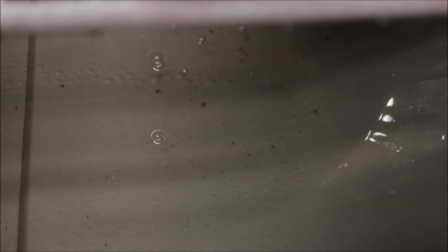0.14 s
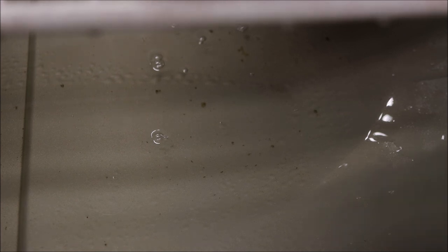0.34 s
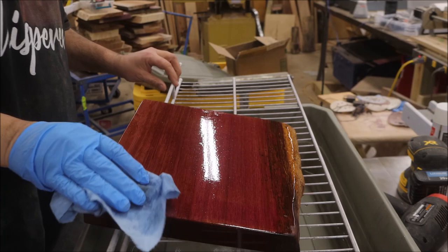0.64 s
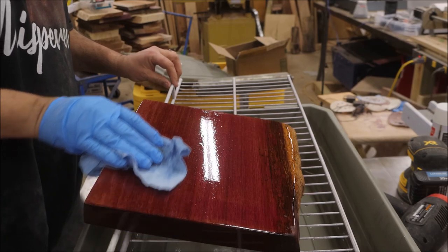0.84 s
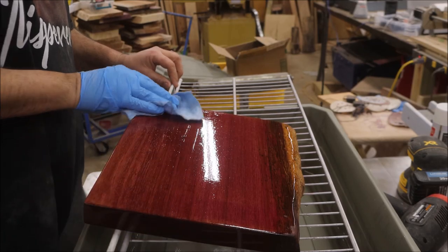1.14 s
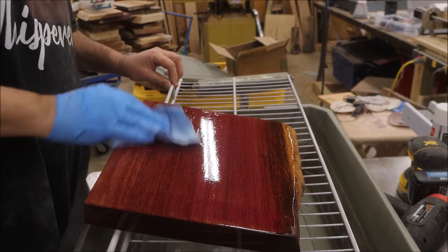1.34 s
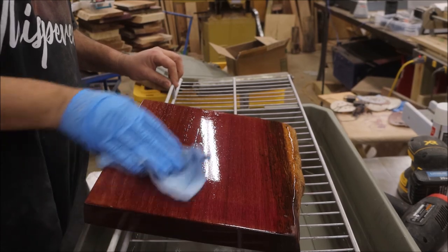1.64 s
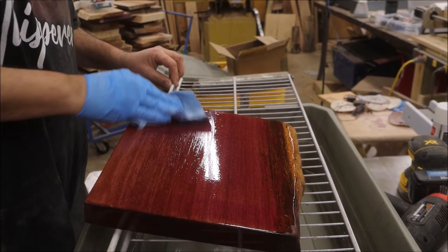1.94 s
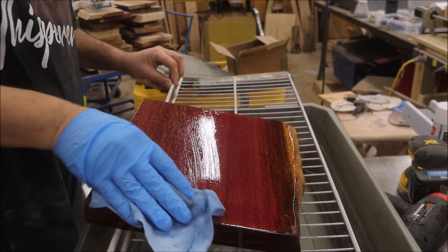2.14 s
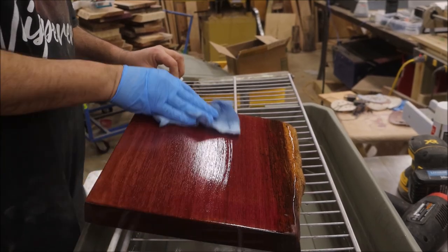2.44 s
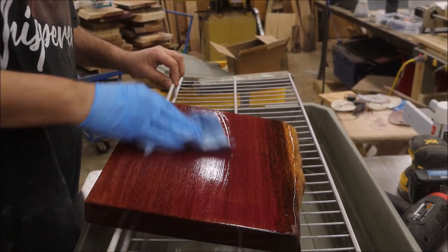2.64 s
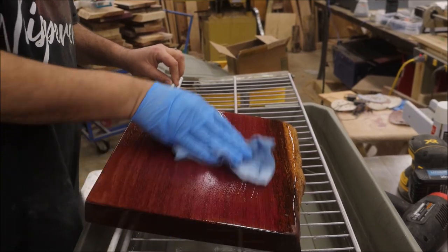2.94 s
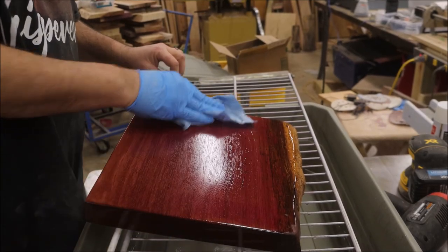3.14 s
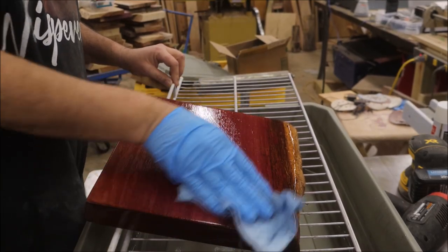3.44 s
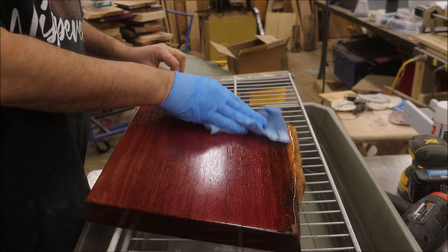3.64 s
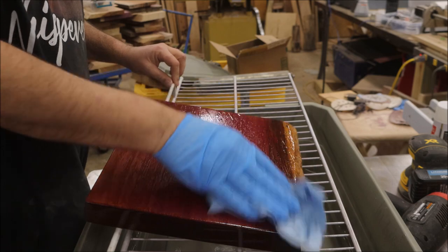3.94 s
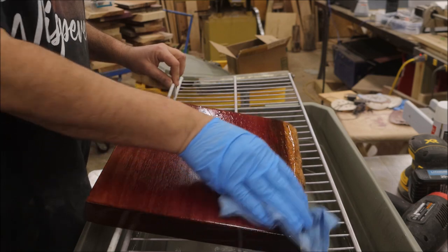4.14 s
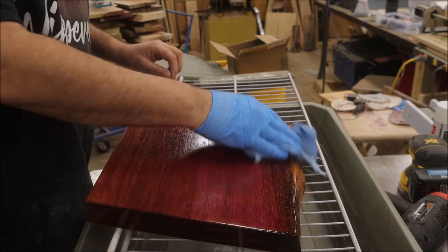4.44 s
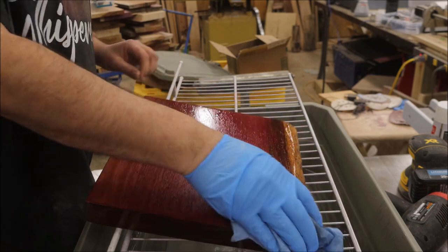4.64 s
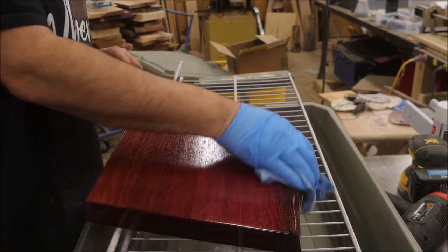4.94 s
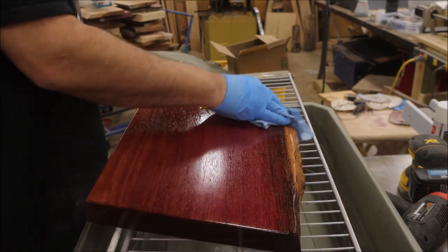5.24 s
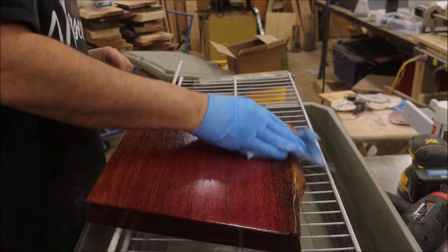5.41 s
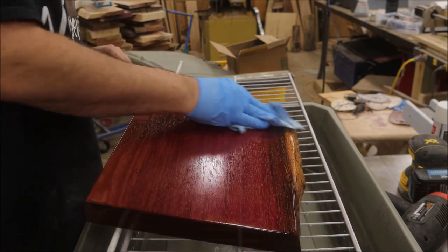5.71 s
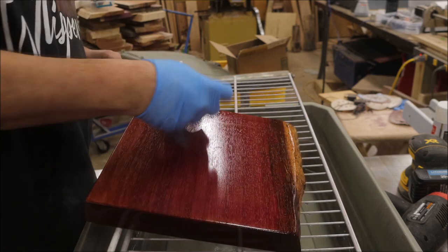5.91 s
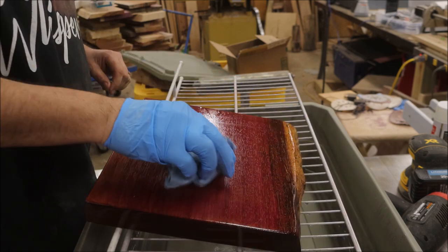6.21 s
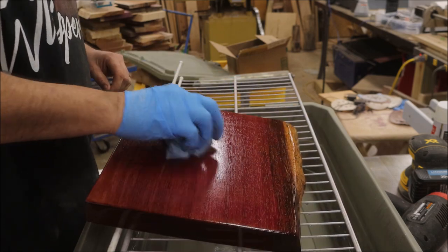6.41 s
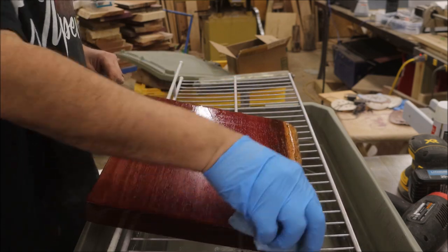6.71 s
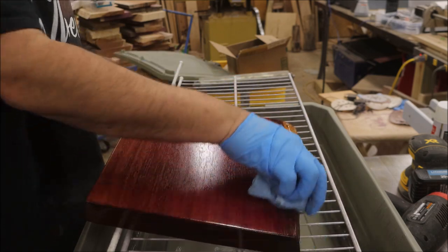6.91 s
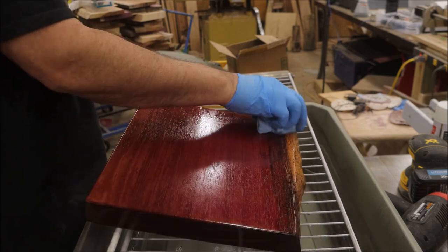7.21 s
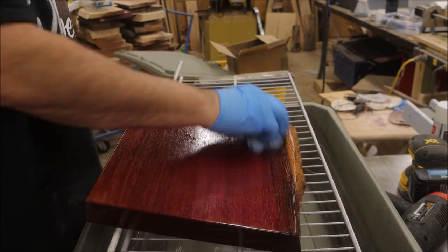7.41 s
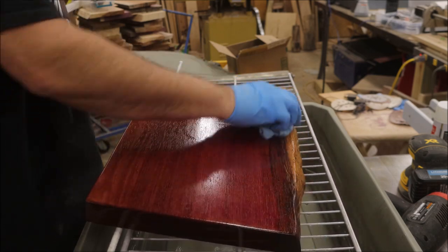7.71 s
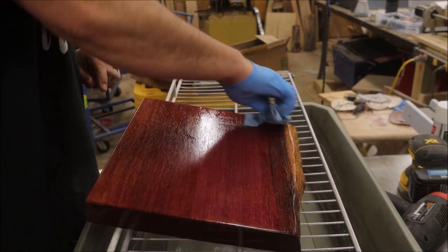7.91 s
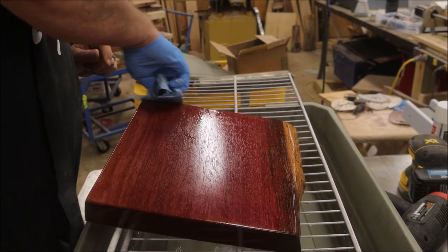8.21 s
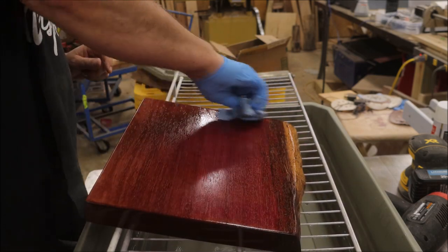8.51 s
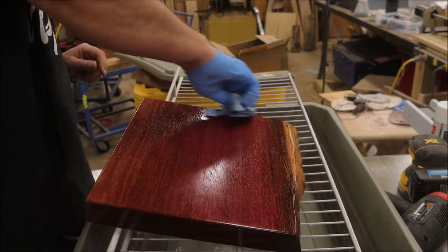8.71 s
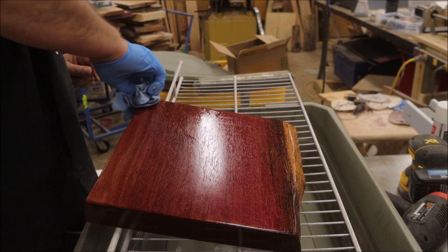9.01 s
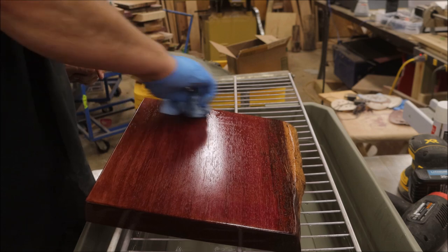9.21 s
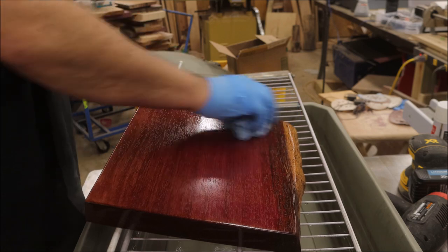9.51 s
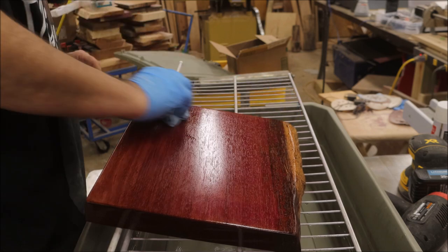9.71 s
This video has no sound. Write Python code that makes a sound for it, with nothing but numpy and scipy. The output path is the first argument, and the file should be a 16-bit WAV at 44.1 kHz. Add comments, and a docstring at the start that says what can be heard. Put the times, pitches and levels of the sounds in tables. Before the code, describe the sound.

A quiet workshop with a faint, dull background, heard close and almost mono. At about 0.5 s a cloth pad starts abruptly on a thick wooden board. Strokes of roughly a quarter to two thirds of a second swish back and forth, airy and crisp when fast, dipping at each turn, over a woody murmur and faint ringing. Soft squeaks appear near 0.8, 1.8, 3.0 and 3.3 s; fibres scuff around 1.5 and 2.1-2.7 s. The board tips and knocks on its wire rack at 3.7, 4.5, 4.9, 7.3 and 7.85 s: short, hollow double clunks with wire chatter and a faint hum, the 4.9 s one duller, the last fullest. Small rattles cluster around 3.6-5.2 s, with tiny ones at 6.2 and 7.0 s. A rougher scuff comes near 7.15 s. Rubbing continues to almost 10 s, with hoarse squeaks around 8.7-9.6 s and a short room echo.

```python
"""Workshop, close up: a gloved hand wipes oil finish over a thick wooden board with a cloth pad.
The cloth is shaped noise that hisses with stroke speed; its drag makes the wood murmur and faintly ring.
The tacky finish makes the pad squeak and grunt; the fibres scuff.
The board lies on a wire rack over a plastic tub: pressed near its edge, it tips and knocks back down,
a sum of decaying modes with wire chatter and a beating hum. The rack rattles; the room echoes softly."""
import sys
import numpy as np
from scipy import signal
from scipy.fft import rfft, irfft, next_fast_len
from scipy.io import wavfile

SR = 44100
rng = np.random.default_rng(int(sys.argv[2]) if len(sys.argv) > 2 else 0)


def digitize_waveform(pressure):
    """Quantize a signal to 16-bit integers and store it at the path in sys.argv[1].

    Rows of a 2-D input are taken as channels; values are limited to [-1, 1].
    """
    field = np.atleast_2d(pressure).T
    bounded = np.clip(field, -1, 1)
    quanta = np.round(bounded * 32767).astype(np.int16)
    wavfile.write(sys.argv[1], SR, quanta)


N = 434826
RUB_START_S = 0.526

# rack spectrum, shaken or rattling: f/Hz, relative level/dB
RACK_SPECTRUM = [(50, -39), (130, -8), (260, 0.5), (620, -5), (850, -6.5), (1500, -7.5), (2500, -27),
                 (8000, -34)]


def amp(db):
    """Decibels to gain."""
    return 10 ** (np.asarray(db) / 20)


def unit(x):
    """Scales to an rms of 1."""
    return x / np.sqrt(np.mean(x ** 2) + 1e-20)


def curve(rows, column):
    """One column of a time table at every sample."""
    rows = np.asarray(rows)
    return np.interp(np.arange(N) / SR, rows[:, 0], rows[:, column])


def read(rows, hz, column=1):
    """One column of a frequency table, on a log axis."""
    rows = np.asarray(rows)
    return np.interp(np.log(hz + 1), np.log(rows[:, 0]), rows[:, column])


def colour(x, spectrum):
    """Gives x a spectrum and an rms of 1."""
    size = next_fast_len(N)
    gain = amp(read(spectrum, np.fft.rfftfreq(size, 1 / SR)))
    return unit(irfft(rfft(x, size) * gain, size)[..., :N])


def wander(per_s, count=N):
    """Random levels joined by straight lines, per_s new ones a second, rms 1."""
    place = np.arange(count) / SR * per_s
    steps = rng.standard_normal(count)
    return unit(np.interp(place, np.arange(count), steps))


def shop_air(level_db=-70.5):
    """Steady, dull background of the workshop: shaped noise."""
    # f/Hz, relative level/dB
    shop_spectrum = [(25, -11), (200, -10), (400, -6), (560, -6.5), (950, -10), (2000, -17.5),
                     (5000, -23.5), (15500, -27)]
    return amp(level_db) * colour(rng.standard_normal(N), shop_spectrum)


def microphone_noise(level_db=-79.5):
    """Faint low-heavy noise of the microphones."""
    spectrum = [(25, 0), (200, -11), (700, -16), (2000, -23)]  # f/Hz, relative level/dB
    return amp(level_db) * colour(rng.standard_normal(N), spectrum)


def strokes():
    """Speed peaks once between turns; returns hiss, fizz and drag levels and the dip at turns, in dB."""
    # strokes from turn to turn; the hand leans on the pad at some turns:
    # turn t/s, hiss at turn/dB, share of stroke speeding up, hiss at full speed/dB,
    # fizz over hiss/dB, drag/dB (levels nominal)
    stroke_rows = [(0.49, -45.5, 0.19, -60, 3, -60), (0.715, -77.5, 0.36, -57.5, -2, -60),
                   (1.399, -64.5, 0.8, -59, 14, -66.5), (1.723, -64.5, 0.2, -61.5, 3.5, -66.5),
                   (2.053, -61, 0.75, -62.5, 14, -64), (2.372, -61, 0.15, -62, 6.5, -69.5),
                   (2.733, -63.5, 0.72, -62.5, 13, -68), (2.988, -54.5, 0.3, -62, 6, -64.5),
                   (3.302, -60.5, 0.74, -60.5, 10, -64.5), (3.577, -58.5, 0.16, -59.5, 6.5, -61),
                   (3.911, -64.5, 0.72, -61.5, 11, -62), (4.239, -66, 0.46, -60.5, 2.5, -65.5),
                   (4.587, -62.5, 0.48, -60, 11.5, -59), (4.909, -82.5, 0.21, -58.5, -0.5, -59),
                   (5.437, -62.5, 0.94, -58, 10, -60.5), (5.702, -62.5, 0.11, -61.5, 0.5, -59.5),
                   (6.128, -67, 0.57, -59.5, 14, -63), (6.309, -70.5, 0.78, -60, -13, -61.5),
                   (6.617, -75, 0.54, -58.5, -3, -67), (6.893, -66, 0.36, -57, -1, -59),
                   (7.51, -60.5, 0.85, -59, 0, -61.5), (7.763, -61, 0.34, -57.5, 0.5, -61.5),
                   (8.059, -91, 0.24, -55.5, -18, -59), (8.516, -69, 0.79, -61.5, 3, -63.5),
                   (8.816, -75, 0.35, -60, 5.5, -63.5), (9.254, -72, 0.42, -59, -21, -65),
                   (9.677, -61.0, 0.65, -61.5, 5, -62.5)]
    last_turn_s = 9.95
    arch = 0.73  # power under 1 rounds the speed ramps
    halt_depth_db, halt_s = 4, 0.021  # the pad all but stops at each turn
    slow_fizz_db, slow_drag_db = -18, 3  # a slow pad loses its fizz and clings a little more
    stall_db, stall_share = -63, 0.48  # hiss below stall_db takes the drag down with it

    t = np.arange(N) / SR
    turn_s, turn_db, rise, full_db = np.transpose(stroke_rows)[:4]
    edges = np.append(turn_s, last_turn_s)
    k = np.clip(np.searchsorted(turn_s, t) - 1, 0, len(turn_s) - 1)
    since = np.maximum(t - edges[k], 0)
    until = edges[k + 1] - t
    done = since / (since + until)
    rise = np.clip(rise, .03, .97)[k]
    speed = np.minimum(done / rise, (1 - done) / (1 - rise)) ** arch  # 0 to 1

    # ramp from the turn behind, then towards the turn ahead
    slowest = amp(np.append(turn_db, turn_db[-1]))[k + (done >= rise)]
    hiss_db = 20 * np.log10(slowest + (amp(full_db)[k] - slowest) * speed)
    fizz_db = hiss_db + curve(stroke_rows, 4) + slow_fizz_db * (1 - speed)
    stall = stall_share * np.minimum(hiss_db - stall_db, 0)
    drag_db = curve(stroke_rows, 5) + slow_drag_db * (1 - speed) + stall
    halt_db = halt_depth_db * np.exp(-(np.minimum(since, until) / halt_s) ** 2)
    return hiss_db, fizz_db, drag_db, halt_db


def friction(snag_db, judder_db, snags_per_s=900, judder_per_s=50):
    """Countless tiny fibre slips and a few larger snags, under an uneven grip."""
    slips = rng.standard_normal(N)
    snags = rng.laplace(size=N) * (rng.random(N) < snags_per_s / SR)
    grip = amp(judder_db * wander(judder_per_s))
    return (slips + amp(snag_db) * unit(snags)) * grip


def cloth(hiss_db, fizz_db, drag_db, halt_db, uneven_db=0.8, uneven_per_s=18):
    """Speed makes the fibres hiss and fizz; drag shakes wood and rack; the pad's rasp follows both."""
    # all five spectra: f/Hz, relative level/dB
    hiss_spectrum = [(1000, -17), (2500, -9), (4000, -2.5), (7000, -1.5), (9000, -3), (12000, -5),
                     (16000, -11)]
    fizz_spectrum = [(4000, -20), (7000, -4), (10000, -2), (12500, 1.5), (14500, 1), (16000, -5)]
    rasp_spectrum = [(1200, -29), (2200, -9.5), (2750, -5), (3400, 0.5), (3850, -1.5), (4300, -7.5),
                     (4900, -15.5), (8000, -26.5)]
    wood_spectrum = [(40, -18), (130, -2.5), (330, -8), (650, -9), (900, -4.5), (1400, 3), (1750, 1),
                     (2100, 1), (3000, -12), (9000, -48)]

    press = amp(uneven_db * wander(uneven_per_s) - halt_db)
    hiss = colour(friction(snag_db=-11.5, judder_db=1.2), hiss_spectrum) * amp(hiss_db + 0.23)
    fizz = colour(friction(snag_db=-26, judder_db=1.0), fizz_spectrum) * amp(fizz_db + 1.1)
    rasp_db = -58.5 + 0.5 * (hiss_db - hiss_db.mean()) + 0.26 * (drag_db - drag_db.mean())
    rasp = colour(friction(snag_db=-13.5, judder_db=1.55), rasp_spectrum) * amp(rasp_db)
    wood = colour(friction(snag_db=-5.0, judder_db=2.5), wood_spectrum) * amp(drag_db - 0.56)
    shudder = colour(friction(snag_db=-5.5, judder_db=2.0), RACK_SPECTRUM) * amp(drag_db - 7.5)
    rubbing = np.arange(N) / SR > RUB_START_S
    return (hiss + fizz + rasp + wood + shudder) * press * rubbing


def board_ring(low_db, high_db, rise_cycles=2.03):
    """Board's answer to one tap: modes build over a few cycles; no two taps hit quite the same spot."""
    # modes of the board on its rack: nominal f/Hz, relative level/dB, t60/s
    board_modes = [(79.5, -27, 0.22), (118.5, -22, 0.23), (163.5, -16, 0.23), (203, -20.5, 0.25),
                   (228.5, -19, 0.3), (254.8, -18, 0.21), (280.8, -9, 0.1), (330, -19.5, 0.24),
                   (539, -10.5, 0.091), (618, -15, 0.16), (660.4, -3.5, 0.1), (700.3, -13.5, 0.16),
                   (955, -23, 0.18), (1090, -23, 0.17), (1290, -29, 0.3), (1405, -10, 0.071),
                   (1594, -5.5, 0.036), (1685, -8.5, 0.066), (1932, -22.5, 0.13), (2036, -21.5, 0.076),
                   (2725, -19.5, 0.038), (3442, -5.5, 0.012)]
    t = np.arange(SR // 3) / SR
    ring = np.zeros(len(t))
    scatter = rng.standard_normal((len(board_modes), 2))
    for (hz, db, t60_s), (detune, share) in zip(board_modes, scatter):
        high = np.clip(np.log2(hz / 700), 0, 1)  # low modes to 700 Hz, high from 1400 Hz
        hz = hz * (1 + .007 * detune)
        db = db + 1.2 * share + low_db + (high_db - low_db) * high
        onset = 1 - np.exp(-t * hz / rise_cycles)
        ring += amp(db - 60 * t / t60_s) * np.sin(2 * np.pi * hz * t) * onset
    return np.pad(ring, (0, SR - len(ring)))


def singing_board(drag_db):
    """The dragging pad keeps the board's high modes ringing faintly: noise through the modes."""
    bunched_s, flat_db, bunched_db = 6.15, -14.5, -7  # bunched under the fingertips, it rings more
    ring = unit(signal.fftconvolve(rng.standard_normal(N), board_ring(-30, 0))[:N])
    t = np.arange(N) / SR
    sing_db = np.where(t < bunched_s, flat_db, bunched_db)
    return ring * amp(drag_db + sing_db) * (t > RUB_START_S)


def squeaks():
    """Tacky stick and slip gather loosely around one pitch, which may slide; each swells and fades."""
    # centre t/s, half length to 1/e/s, f/Hz, half width/Hz, level/dB, glide/(Hz/s)
    squeak_rows = [(0.819, 0.12, 1720, 160, -62.5, -4), (1.767, 0.054, 1707, 99.5, -64, 0),
                   (2.987, 0.024, 1305, 202, -62, -22000), (3.316, 0.057, 1436, 198.4, -58, 2),
                   (7.088, 0.016, 299, 110.3, -58, -6000), (8.697, 0.025, 6700, 1100, -58, -2),
                   (8.961, 0.014, 235, 46.2, -60, -1.5), (9.102, 0.1, 3200, 505, -57, 3),
                   (9.548, 0.11, 1658, 449.4, -56.5, -4000), (9.635, 0.038, 515, 231, -62, -5000)]
    out, t = np.zeros(N + SR), np.arange(SR) / SR - .5
    for s, half_s, hz, width_hz, db, glide in squeak_rows:
        phase = 2 * np.pi * (hz + glide * t / 2) * t
        hoarse = wander(3 * width_hz, count=SR) * np.cos(phase)
        hoarse += wander(3 * width_hz, count=SR) * np.sin(phase)
        swell = np.exp(-np.minimum((t / half_s) ** 2, 20))
        start = round((s - .5) * SR)
        out[start:start + SR] += amp(db) * swell * hoarse
    return out[:N]


def scuffs():
    """Brief patches where the fibres snag and tear free in sparse little ticks."""
    # centre t/s, half length to 1/e/s, level/dB
    scuff_rows = [(1.455, 0.09, -54.5), (2.095, 0.065, -56), (2.376, 0.068, -57), (2.748, 0.084, -56.5),
                  (4.77, 0.04, -58), (6.043, 0.022, -54), (7.156, 0.074, -50)]
    # f/Hz, relative level/dB
    scuff_spectrum = [(300, -8), (1600, -2), (3600, -1), (4800, -7.5), (7500, -11.5), (12000, -34)]
    t = np.arange(N) / SR
    patches = np.zeros(N)
    for s, half_s, db in scuff_rows:
        patches += amp(db) * np.exp(-np.minimum(((t - s) / half_s) ** 2, 20))
    ticks = friction(snag_db=-4.5, judder_db=-1, snags_per_s=500)
    return colour(ticks, scuff_spectrum) * patches


def rattles(contacts_per_s=900):
    """The rack shifts: short flurries of dull little contacts between wires, board and tub."""
    # start t/s, starting level/dB, decay to 1/e/s
    rattle_rows = [(3.609, -51, 0.19), (4.388, -56.5, 0.077), (4.731, -44, 0.0071), (4.746, -44, 0.0054),
                   (4.765, -48, 0.0051), (4.793, -51.5, 0.097), (5.056, -51.5, 0.1), (5.203, -54, 0.094),
                   (6.167, -48, 0.007), (7.036, -50, 0.01)]
    contacts = rng.standard_normal(N) * (rng.random(N) < contacts_per_s / SR)
    t = np.arange(N) / SR
    flurries = np.zeros(N)
    for s, db, decay_s in rattle_rows:
        flurries += amp(db) * (t >= s) * np.exp(-np.minimum(abs(t - s) / decay_s, 20))
    return colour(contacts, RACK_SPECTRUM) * flurries


def knocks(slap_low_db=-17, chatter_s=0.01):
    """An edge lands and rings; the board slaps flat, chatters and is choked; rack and tub hum on."""
    # landing t/s, low modes/dB, high modes/dB, contact hardness as low-pass corner f/Hz,
    # slap/dB, chatter/dB, hum/dB (levels before the high-pass)
    knock_rows = [(3.7016, -10.5, -26, 3000, -18, -51.5, -3.5), (4.5002, -10, -20, 3600, -14.5, -47, -3.5),
                  (4.8995, -14.5, -17, 1400, -27, -66, -11.5), (7.272, -12, -14.5, 3130, -24, -54, -3.5),
                  (7.8527, -8, -8.5, 3630, -16.5, -45, 1)]
    # sympathetic close mode pairs that swell and beat: f/Hz, relative level/dB, t60/s, beat f/Hz
    hum_modes = [(200, -50.5, 1.2, 1.6), (458, -36.5, 0.84, 3.16), (552, -52, 1.33, 1.6)]
    # wire chatter: f/Hz, relative level/dB
    chatter_spectrum = [(900, -18), (1900, -2), (3600, -5), (4600, -17), (8000, -35)]
    slap_delay_s, slap_hz = 0.01, 1720  # slap after landing, its low-pass corner
    seat_s, seat_fade_s, seat_db = 0.017, 0.0033, -8  # the rack chokes the first ring
    radiate_hz = 72  # longer waves slip around the board

    sound, t = np.zeros(N + SR), np.arange(SR) / SR
    seat = amp(seat_db * (1 + np.tanh((t - seat_s) / seat_fade_s)) / 2)
    hum = np.zeros(SR)
    for hz, db, t60_s, beat_hz in hum_modes:
        beat = np.sin(np.pi * beat_hz * t)
        hum += amp(db - 60 * t / t60_s) * np.sin(2 * np.pi * hz * t) * beat
    wires = colour(rng.standard_normal(N), chatter_spectrum)
    burst = np.exp(-np.minimum(((t - seat_s) / chatter_s) ** 2, 20))
    for s, low_db, high_db, corner_hz, slap_db, chatter_db, hum_db in knock_rows:
        start, flat = round(s * SR), round((s + slap_delay_s) * SR)
        edge = signal.lfilter(*signal.butter(2, corner_hz, fs=SR), board_ring(low_db, high_db)) * seat
        chatter = amp(chatter_db) * wires[start:start + SR] * burst
        sound[start:start + SR] += edge + chatter + amp(hum_db) * hum
        slap = board_ring(slap_db + slap_low_db, slap_db)
        sound[flat:flat + SR] += signal.lfilter(*signal.butter(2, slap_hz, fs=SR), slap)
    radiate = signal.butter(3, radiate_hz, "highpass", fs=SR, output="sos")
    return signal.sosfilt(radiate, sound[:N])


def room(x, echo_s=0.0096, echo_db=-14, gap_s=0.015, build_s=0.0067):
    """One near reflection, then dense ones, each band dying at its own speed."""
    # f/Hz, tail energy before the gap and build-up/dB, t60/s
    room_bands = [(73.4, -2, 0.79), (111, -16, 0.4), (215, 4.5, 0.2), (333, -8, 0.36), (513, -12.5, 1.4),
                  (643, -11, 0.26), (1220, -5.5, 0.55), (1640, -12, 0.29), (12100, -19, .2)]
    taps = rng.choice([-1., 1.], SR) * (rng.random(SR) < 4000 / SR)  # 4000 reflections/s
    hz, t, z = signal.stft(taps, SR, nperseg=512)
    t60_s = read(room_bands, hz, column=2)[:, None]
    decay = amp(read(room_bands, hz)[:, None] - 60 * t / t60_s)
    shape = decay * np.sqrt(2 * np.log(1000) / t60_s)  # tail energy independent of t60
    tail = signal.istft(z * shape, SR, nperseg=512)[1][:SR] / np.linalg.norm(taps)
    tail = tail * np.clip((np.arange(SR) / SR - gap_s) / build_s, 0, 1)
    tail[round(echo_s * SR)] += amp(echo_db)
    return signal.fftconvolve(x, tail)[:N]


def scene():
    """Nearly all straight ahead: knocks and rattles lean a little right, microphone noise has width."""
    hiss_db, fizz_db, drag_db, halt_db = strokes()
    rub = cloth(hiss_db, fizz_db, drag_db, halt_db)
    rub += singing_board(drag_db - halt_db) + squeaks() + scuffs()
    hits = knocks() + rattles()
    middle = rub + hits + room(hits + amp(-5.5) * rub) + shop_air()
    side = microphone_noise() - amp(-32.5) * hits
    return np.array([middle + side, middle - side])


def record(dry):
    """Steep linear-phase low-pass at the top of the band."""
    cut_hz = 16040
    taps = signal.firwin(511, cut_hz, window=("kaiser", 9), fs=SR)
    return signal.oaconvolve(dry, taps[None], "same")


dry = scene()
out = record(dry)
digitize_waveform(out)
```